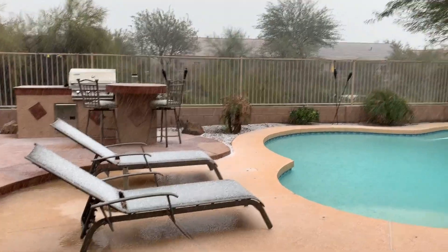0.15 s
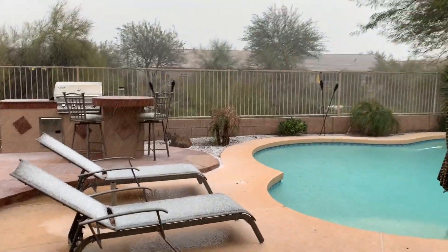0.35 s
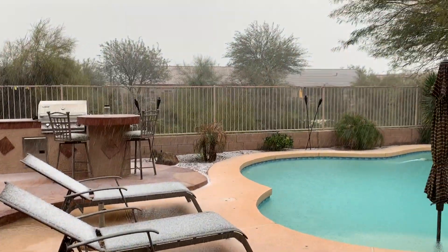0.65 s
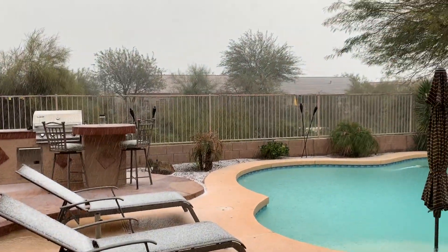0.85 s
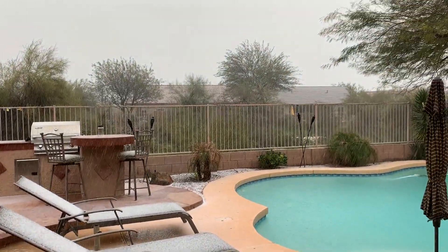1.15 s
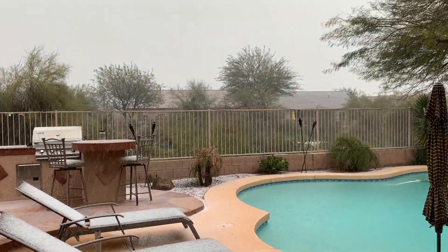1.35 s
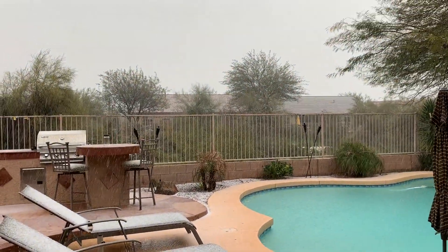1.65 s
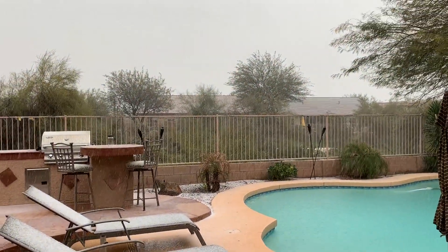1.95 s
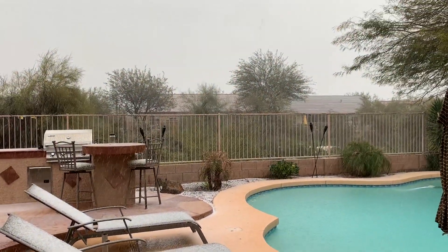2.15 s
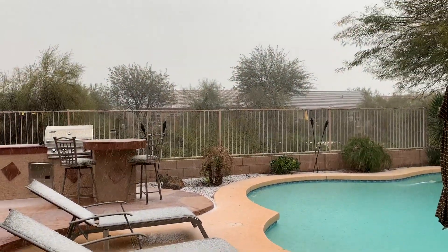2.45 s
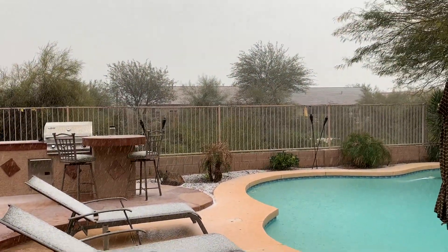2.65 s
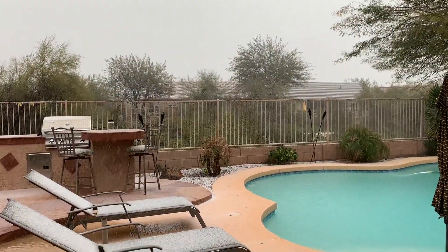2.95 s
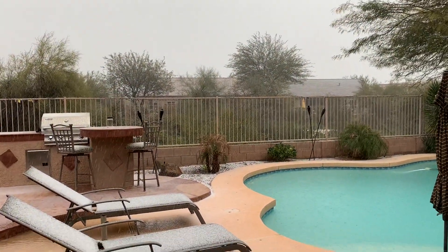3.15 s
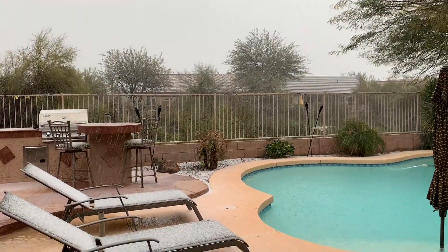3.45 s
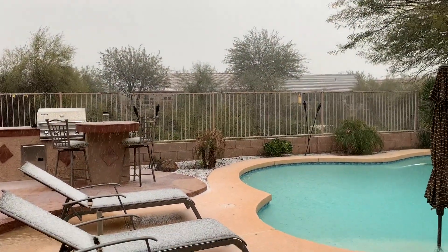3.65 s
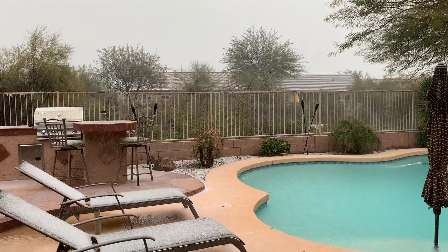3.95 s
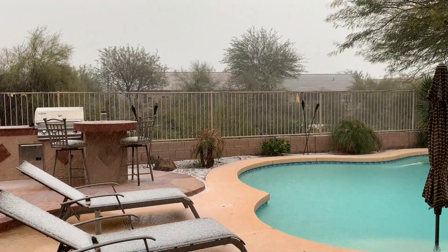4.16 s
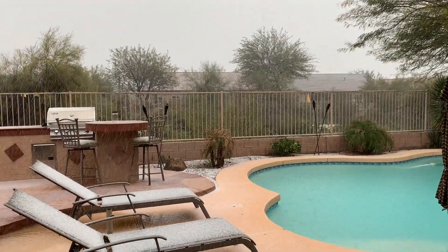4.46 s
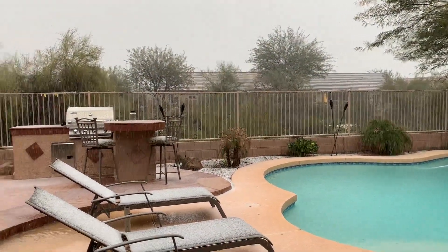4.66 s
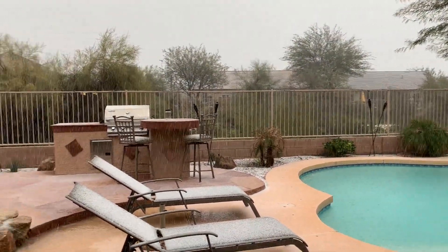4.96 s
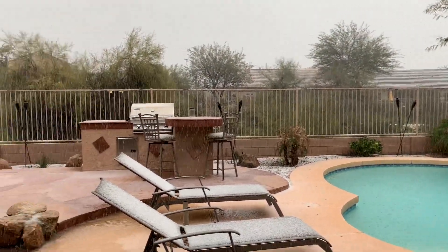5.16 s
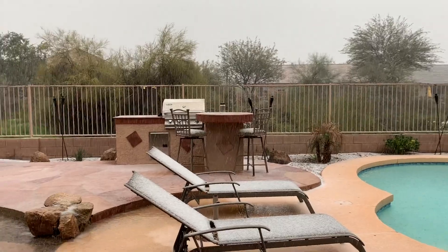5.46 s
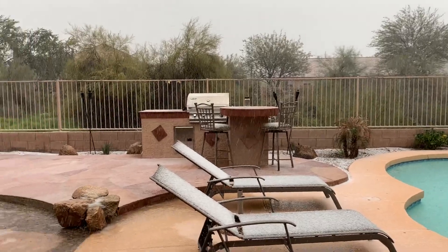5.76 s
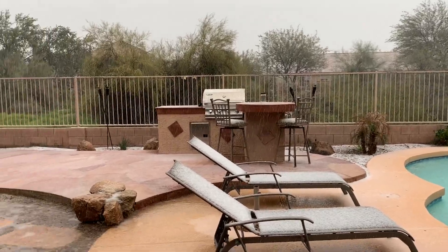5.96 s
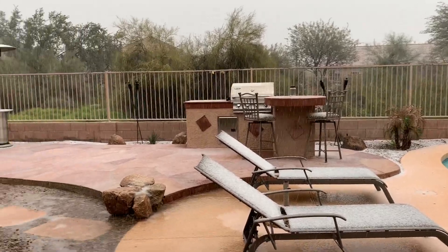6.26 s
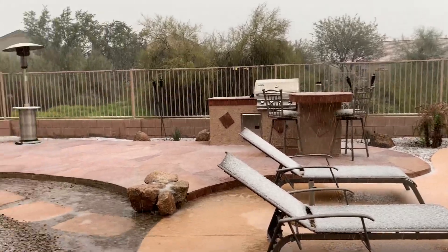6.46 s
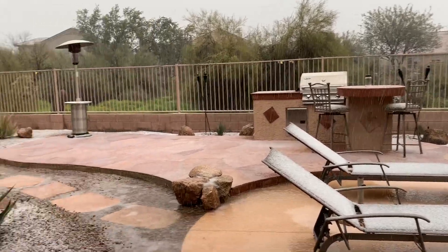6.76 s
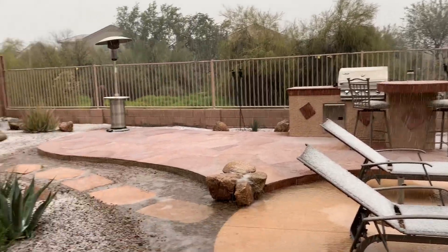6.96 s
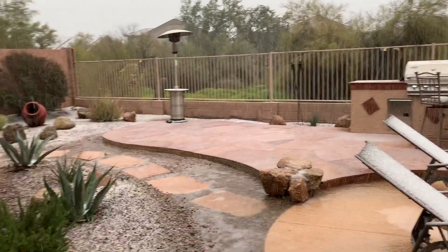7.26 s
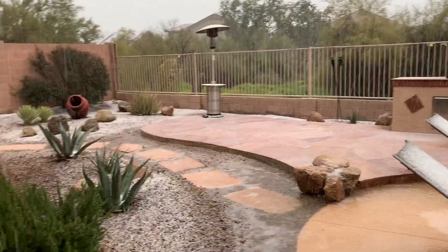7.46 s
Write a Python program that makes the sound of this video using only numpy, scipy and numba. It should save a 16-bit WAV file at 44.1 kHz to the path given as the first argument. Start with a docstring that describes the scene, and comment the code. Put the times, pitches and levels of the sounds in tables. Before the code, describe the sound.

Sleet patters densely across a backyard patio, puddle drips plopping and pellets clicking nearby, while soft gusts bump the microphone and one pellet crackles apart.

```python
"""Ice pellets and rain fall on a concrete patio, loungers and a pool, heard by a phone under the eaves.
From the start, thousands of tiny clicks and pings merge into a grainy hiss, over wind made of low noise.
Soon drips plop (a strike, then a ringing bubble), near pellets tick, and hollow furniture knocks.
The level dips briefly near 1 s. From about 2.4 s gusts thump on the microphone ports as short low tones.
Near 6.4 s a pellet shatters close by, and its chips crackle as a cluster of tiny clicks."""
import sys
import numpy as np
from scipy import signal
from scipy.fft import rfft, irfft, next_fast_len
from scipy.io import wavfile
from scipy.ndimage import uniform_filter1d
from numba import njit

SR = 44100
rng = np.random.default_rng(int(sys.argv[2]) if len(sys.argv) > 2 else 0)


def file_out(sig):
    """Save sig as 16-bit WAV at sys.argv[1]."""
    # one column per channel
    cols = np.atleast_2d(sig).T
    # limit, then scale
    lim = np.clip(cols, -1, 1)
    pcm = np.round(lim * 32767).astype(np.int16)
    wavfile.write(sys.argv[1], SR, pcm)


N = 336065
FFT_SIZE = next_fast_len(N)
TIME, HZ = np.arange(N) / SR, np.fft.rfftfreq(FFT_SIZE, 1 / SR)


def undb(db):
    """Turn decibels into a plain gain."""
    return 10 ** (np.asarray(db) / 20)


def curve(table):
    """Gain over time, drawn through rows of start_s, level_db."""
    return undb(np.interp(TIME, *np.transpose(table)))


def colour(table):
    """Gain over frequency, drawn through rows of pitch_hz, level_db on a log pitch scale."""
    hz, db = np.transpose(table)
    return undb(np.interp(np.log(HZ + 1), np.log(hz), db))


def walk(rate_hz):
    """A slow random wander: random steps, rate_hz of them a second, smoothed twice."""
    hold = int(SR / rate_hz)
    steps = np.repeat(rng.standard_normal(N // hold + 1), hold)
    return uniform_filter1d(uniform_filter1d(steps, hold), hold)[:N]


def highpass(x, hz):
    """Remove the bass, since small things move no air there."""
    return signal.sosfilt(signal.butter(2, hz, "high", fs=SR, output="sos"), x)


def impacts(per_s, scatter_db):
    """Spectrum of a shower of clicks of either sign, a few much louder than the rest; overall rms 1."""
    when, sign, size = rng.random((3, FFT_SIZE))
    loudness = undb(-scatter_db * np.log(size + 0.00043))
    clicks = (when < per_s / SR) * np.sign(sign - .5) * loudness
    return rfft(clicks / clicks.std())


@njit
def rings(length, start, turn, decay, size):
    """Add up fading tones; turn is radians per sample and decay is the fading rate per sample."""
    out = np.zeros(length)
    for k in range(len(start)):
        step, state = np.exp(1j * turn[k] - decay[k]), size[k] + 0j
        for i in range(start[k], min(start[k] + int(5 / decay[k]), length)):
            state *= step
            out[i] += state.imag
    return out


def pings(per_s, cycles, scatter_db):
    """Spectrum of many small pellets and bubbles, each ringing some cycles at its own pitch; rms 1."""
    when, pitch, size = rng.random((int(per_s * N / SR), 3)).T
    turn = 2 * np.pi * (400 + 15200 * pitch) / SR  # 400 to 15600 Hz
    decay = turn / (2 * np.pi * cycles)
    # the square root gives short and long rings the same energy
    loudness = np.sqrt(decay) * undb(-scatter_db * np.log(size + 0.0074))
    x = rings(FFT_SIZE, (when * N).astype(np.int64), turn, decay, loudness)
    return rfft(x / x.std())


def add(out, s, db, hz, pan_db, lag_ms, rise_s, t60_s, glide=0., noisy=0., grit_hz=1000., loose=0.85):
    """Add one ringing impact: a quick rise to s, then a fade; a hard contact is partly noise."""
    pad = 16  # samples of room for the ear that hears it first
    t = np.arange(int((rise_s + t60_s) * SR) + 2 * pad) / SR
    start = int((s - rise_s) * SR) - pad
    # the push peaks near s, give or take a random shift of about `loose` radians
    phase = np.pi / 2 - 2 * np.pi * hz * rise_s + loose * rng.standard_normal()
    grit = 1 + noisy * rng.standard_normal(2048)
    for ear, side in enumerate((.5, -.5)):  # left, right
        u = np.maximum(t - pad / SR - side * lag_ms / 1000, 0)
        rise = np.sin(np.pi / 2 * np.minimum(u / rise_s, 1)) ** 2
        shape = rise * undb(-60 * np.maximum(u - rise_s, 0) / t60_s)
        # the pitch moves by the share `glide` over t60_s
        ring = np.sin(phase + 2 * np.pi * hz * u * (1 + glide * u / t60_s / 2))
        wave = shape * ring * np.interp(u * grit_hz, np.arange(len(grit)), grit)
        # give it the energy of a clean tone with this shape
        wave *= undb(db + side * pan_db) * np.sqrt(np.sum(shape ** 2) / np.sum(wave ** 2) / 2)
        out[ear, start:start + len(t)] += wave[:N - start]


# Loudness of the whole fall, applied on top of its colour: start_s, level_db
FALL_LEVEL = [(0.0, -35.5), (1.12, -37), (3.5, -37.5), (6.11, -37.5), (6.49, -37), (6.9, -38),
              (7.62, -37.5)]
# Tone of the patter in the left channel: pitch_hz, level_db (relative)
PATTER_COLOUR = [(100, -8), (300, -1), (600, 2), (1000, 0.6), (2000, 1), (4000, 2.05), (7000, 0.5),
                 (9000, -1), (10600, -5), (11500, -4.5), (13000, -4.5), (15700, -5)]
# Right channel against the left, with an abrupt lift in the treble: pitch_hz, level_db (right minus left)
RIGHT_COLOUR = [(200, 0), (1000, -3.5), (1900, -0.7), (4500, -0.6), (7930, 0.3), (8030, 6.6), (9400, 2.6),
                (10500, 0), (16000, 0)]
# Stereo likeness of the hiss by pitch: opposite in the two channels near 11 kHz, identical near 13.5 kHz:
# pitch_hz, likeness (0 to 1), phase_turns (right against left)
STEREO_LIKENESS = [(100, .92, 0), (500, .5, 0), (1400, .02, 0), (1500, .02, .5), (1900, .25, .5),
                   (2400, .1, .5), (2950, .22, .5), (3400, .03, .5), (3700, .05, .1), (4300, .36, .05),
                   (4720, .06, -.25), (4950, .4, -.46), (5200, .62, -.5), (5450, .4, -.58),
                   (5750, .22, -.85), (6250, .52, -1.03), (6850, .2, -1.3), (7230, .52, -1.51),
                   (7650, .2, -1.6), (8000, .27, -2.07), (8300, .43, -2.12), (9300, .42, -1.97),
                   (10300, .55, -1.73), (10900, 1, -1.5), (11900, 1, -1.5), (12100, .6, -1.35),
                   (12650, .65, -1.15), (12850, 1, -1), (14200, 1, -1), (14500, .6, -.87),
                   (14900, .55, -.65), (15100, 1, -.5)]


def patter():
    """The dense fall: each band has its own shower and flickers a little; stereo likeness varies by pitch."""
    hz, like, turns = np.transpose(STEREO_LIKENESS)
    like = np.clip(np.interp(HZ, hz, like), 0, 1)
    from_left = like * np.exp(2j * np.pi * np.interp(HZ, hz, turns))
    right_only = np.sqrt(1 - like ** 2)
    left_colour = colour(PATTER_COLOUR)
    right_colour = left_colour * colour(RIGHT_COLOUR)
    # a short smear: every impact arrives with its reflections off slab and walls
    smear = rfft(rng.standard_normal(256) * np.exp(-np.arange(256) / 40), FFT_SIZE)
    smear /= np.abs(smear)  # spread in time only, same tone
    swell = walk(9)
    octave = np.clip(np.log2(HZ / 250 + 1e-9), 0, 6)
    pings_a = undb(-6.5) * pings(1500, 36.0, 2.22)
    pings_b = undb(-6.5) * pings(1500, 36.0, 2.22)
    out = np.zeros((2, N))
    for k in range(7):  # overlapping octave bands, centred from 250 Hz up
        band = np.sqrt(np.clip(1 - np.abs(octave - k), 0, 1)) * smear
        a = impacts(9000, 1.97) + pings_a
        b = impacts(9000, 1.65) + pings_b
        left = left_colour * a
        right = right_colour * (from_left * a + right_only * b)
        pair = irfft(band * np.array([left, right]))[:, :N]
        out += pair * undb(.45 * swell + .6 * walk(25))  # all bands swell together, each flickers alone
    return out * curve(FALL_LEVEL)


# Strength of the wind's rumble, before its random swell: start_s, level_db
GUST_LEVEL = [(0.0, -49.5), (.59, -48), (1.4, -51.5), (1.6, -50), (2.22, -49.5), (2.35, -46.5),
              (2.5, -35.5), (2.68, -42), (2.8, -45.5), (3.35, -42), (3.95, -45), (4.46, -52), (4.63, -45),
              (4.75, -50), (4.97, -42.5), (5.12, -37), (5.22, -52.5), (5.82, -45.5), (6.1, -50),
              (6.92, -45), (7.39, -44), (7.51, -36.5), (7.62, -47)]
# Tone of the low rumble: pitch_hz, level_db (relative)
RUMBLE_COLOUR = [(12, -22), (25, -6.5), (45, 0.5), (80, -3), (130, -10.5), (250, -37), (600, -89)]
# Tone of the higher flutter: pitch_hz, level_db (relative)
FLUTTER_COLOUR = [(60, -15.5), (130, 1.7), (220, -1), (350, -8.5), (600, -49), (1200, -80)]
# Puffs that catch a port edge and flutter hard: peak_s, peak_db (before the swell), half_width_s (to 1/e)
EDGE_PUFFS = [(2.47, -53, 0.035), (2.6, -53, 0.036), (2.69, -41, 0.021), (2.87, -60, 0.037),
              (5.056, -38, 0.019), (7.07, -62, 0.023), (7.45, -48.5, 0.025)]
# flutter level at the calm gust level, and the dB it gains per dB of gust
CALM_DB, FLUTTER_DB, FLUTTER_SLOPE = -58, -56, 0.14


def wind():
    """Turbulence is low noise that both ports hear nearly alike; its higher flutter grows with the gusts."""
    gust = curve(GUST_LEVEL)
    flutter = undb(FLUTTER_DB) * (gust / undb(CALM_DB)) ** FLUTTER_SLOPE
    for s, db, width_s in EDGE_PUFFS:
        flutter = flutter + undb(db) * np.exp(-((TIME - s) / width_s) ** 2)
    out = np.zeros((2, N))
    for tone, gain in ((RUMBLE_COLOUR, gust), (FLUTTER_COLOUR, flutter)):
        noise = np.array([impacts(3000, 1.0), impacts(3000, 1.6)])
        mid, side = irfft(colour(tone) * noise)[:, :N]
        # a weak second noise, of opposite sign at the two ports
        pair = (mid + undb(-13.0) * side * np.array([[1], [-1]])) / mid.std()
        out += pair * gain * undb(1.36 * walk(14))
    return out


# Drips into puddles: start_s, level_db (of the strike, before the bass cut), pitch_hz (of the bubble),
# pan_db (left minus right), ring_s (time to fade 60 dB), glide (share the pitch rises over the ring)
PUDDLE_DRIPS = [(0.04, -33, 647, 1.5, 0.036, 1), (0.392, -37.5, 1025, 7, 0.053, 1),
                (1.191, -32, 1016, 2.5, 0.044, 1), (1.219, -32.5, 580, -2, 0.12, .2),
                (1.276, -39, 800, 2, 0.13, 0), (1.398, -38, 1420, 5, 0.12, 0.5),
                (1.418, -41, 740, 2, 0.1, 0), (1.574, -38, 607, 3, 0.079, 4.5),
                (2.066, -34, 1290, 2.0, .018, 2), (2.103, -33, 1210, 5, 0.03, 2.5),
                (2.136, -38, 1020, 1.5, 0.02, 2), (2.537, -38, 1400, 2.5, 0.05, 1.5),
                (2.79, -32.5, 573, 2.0, 0.044, 0), (2.812, -42, 500, 2, 0.16, 3),
                (2.985, -39, 584, 5, .08, 0), (3.023, -33, 1090, 3.0, 0.084, -0.5),
                (3.111, -37, 580, 5, 0.12, 1), (4.711, -36.5, 1000, 6, .04, -0.5),
                (4.806, -40, 840, 2.5, .02, -1.5), (4.942, -30, 880, 3, .022, 1),
                (4.951, -34, 1050, 5, .02, 2), (5.443, -35, 985, 3.5, 0.034, 2),
                (5.479, -38, 715, 3, 0.036, 1.5), (5.578, -38, 955, 7, 0.067, 0.5),
                (5.641, -29.5, 620, 5, 0.045, 0.5), (5.659, -38, 663, 7, 0.24, 5),
                (6.494, -32.5, 1170, 6, .016, 1.5), (6.578, -27.5, 1620, 6, 0.035, -0.5),
                (6.586, -33, 1570, 6, 0.025, 2), (6.91, -38.5, 1860, -0.5, 0.063, 0.5),
                (7.221, -31.5, 1780, 0.1, 0.025, 0.5), (7.229, -41, 1870, 0.1, 0.12, 1),
                (7.369, -39, 640, 0.1, 0.066, 0.5), (7.545, -43, 1140, 1.5, 0.075, 1.5)]
BUBBLE_DB = -2.5  # the bubble's ring against the strike


def plops():
    """A drop strikes with a short knock, then its trapped bubble rings, often gliding in pitch."""
    out = np.zeros((2, N))
    for s, db, hz, pan_db, t60_s, glide in PUDDLE_DRIPS:
        # the drop strikes
        add(out, s + 0.00133, db, 0.8 * hz, pan_db, -.09, .0006, .009, noisy=0.48, grit_hz=1300)
        # its bubble rings
        add(out, s + 0.00236, db + BUBBLE_DB, hz, pan_db, -.09, .002, t60_s,
            glide=glide, noisy=0.53, grit_hz=302)
        # its echo off the walls
        add(out, s + .012, db - 18, hz, pan_db, .09, .01, .14, noisy=3, grit_hz=600)
    return highpass(out, 350)


# Near pellets on concrete: start_s, level_db (before the bass cut), pitch_hz,
# pan_db (left minus right), lag_ms (left behind right)
CONCRETE_HITS = [(0.1409, -44, 7900, -1.8, -0.095), (0.3883, -22, 3900, 0.3, 0.02),
                 (0.5366, -18, 6700, 1, -0.3), (0.658, -25, 6030, 0.2, -0.32),
                 (1.2203, -22, 6400, -0.4, 0.0), (1.5234, -28, 7900, -5.0, 0.27),
                 (1.689, -23, 4500, -2.7, 0.042), (2.8537, -24, 5940, -1.6, -0.35),
                 (3.5088, -24, 6240, -0.7, 0.0), (3.7491, -27, 13500, 0.5, 0.0),
                 (3.7494, -18, 8700, 0.5, 0.0), (3.7493, -15, 6500, 0.5, 0.0),
                 (3.7497, -17, 4350, 3, -0.024), (3.7584, -28.6, 8250, -4.2, 0.27),
                 (4.9472, -30, 4300, 1, 0.0), (4.9964, -24, 4100, 3.6, 0.0), (5.1252, -21, 8700, -1, -0.23),
                 (5.319, -27, 3940, -1.5, 0.0), (5.6704, -22, 4880, 2.3, -0.27),
                 (5.762, -28, 3550, 1.1, -0.2), (5.9833, -29, 4460, -0.5, -0.22),
                 (6.0288, -26, 13500, 0.4, 0.29), (6.0289, -27, 7000, 0.4, 0.34),
                 (6.033, -21, 7600, -2, 0.29), (6.212, -24, 8100, -2, -0.12),
                 (6.2484, -34, 8720, -0.1, 0.23), (6.3309, -24, 8000, 0.1, 0.26),
                 (6.3697, -21, 14100, -0.3, 0.23), (6.371, -27, 8700, 0, 0.23),
                 (6.3985, -31, 6000, 0, 0.13), (6.4132, -19, 13250, -1.0, 0.23),
                 (6.4134, -24, 9500, -1, 0.2), (6.418, -16.5, 4800, -1, -0.13),
                 (6.4245, -25, 8190, -2.8, -0.11), (6.4334, -17.5, 6160, 0, 0.36),
                 (6.4328, -28, 9300, 0, 0.33), (6.4595, -18.5, 7450, -1, 0.28),
                 (6.4592, -24, 10200, 1, 0.296), (6.885, -26, 5930, -1, 0.0)]


def ticks():
    """A pellet on concrete gives a hard, very short click and a faint wash off the walls."""
    out = np.zeros((2, N))
    for s, db, hz, pan_db, lag_ms in CONCRETE_HITS:
        add(out, s, db, hz, pan_db, lag_ms, .0003, .002, noisy=0.15, grit_hz=8200)
        add(out, s + .004, db - 21, hz, pan_db, -lag_ms, .003, .07, noisy=3, grit_hz=4000)
    return highpass(highpass(out, 2600), 2600)


# Pellets on one hollow piece of furniture to the left: start_s, level_db (before the bass cut)
FURNITURE_HITS = [(0.6386, -33), (1.6044, -28), (2.5508, -40), (3.049, -32), (3.9715, -28), (3.98, -33),
                  (3.996, -38), (4.751, -29.5), (4.946, -31), (5.6414, -30), (5.7586, -34), (6.0147, -32),
                  (6.417, -36)]
KNOCK_HZ, KNOCK_SCATTER = 2260, 0.04  # the pitch scatters by this share with the spot struck
KNOCK_LAG_MS = -0.11  # negative: the left port hears it first


def knocks():
    """A hollow body knocks at two pitches an octave apart, followed by a soft echo."""
    out = np.zeros((2, N))
    for s, db in FURNITURE_HITS:
        hz = KNOCK_HZ * (1 + KNOCK_SCATTER * rng.standard_normal())
        add(out, s, db, hz, 0, KNOCK_LAG_MS, .0006, .009, noisy=0.47, grit_hz=1790)
        # the duller body
        add(out, s, db - 4.0, .5 * hz, 0, KNOCK_LAG_MS, .0006, .008, noisy=0.4, grit_hz=1500)
        # its echo off the walls
        add(out, s + .015, db - 12, .8 * hz, 0, -KNOCK_LAG_MS, .01, .16, noisy=3, grit_hz=2500)
    return highpass(out, 350)


# Eddies that burst on the ports: start_s (of the peak), level_db, pitch_hz
EDDY_BURSTS = [(2.384, -29, 80.6), (2.43, -31, 80), (2.488, -20, 60.3), (2.54, -30, 149), (2.5755, -32, 60),
               (2.646, -30, 60), (2.6897, -27, 60), (2.734, -21, 77), (2.937, -33, 60), (3.1294, -29.5, 60),
               (3.2007, -32, 80), (3.298, -32.5, 50), (3.4615, -27.5, 79.5), (3.5094, -29, 60),
               (3.568, -31, 78.5), (3.668, -34.5, 80), (3.823, -30, 79), (3.868, -30.5, 60),
               (4.001, -30, 59), (4.623, -31.5, 59.5), (5.0294, -33, 60), (5.042, -33, 110),
               (5.0535, -28.5, 130), (5.079, -26, 62), (5.662, -31, 60), (7.143, -29, 50),
               (7.187, -29.5, 80.6), (7.211, -28.5, 60), (7.31, -31, 91), (7.443, -24, 79),
               (7.4774, -28, 79.4), (7.5708, -32, 80)]


def thumps():
    """A single eddy bursting on the ports gives a short, low, slightly noisy tone."""
    out = np.zeros((2, N))
    for s, db, hz in EDDY_BURSTS:
        pan_db = 2.6 * rng.standard_normal()
        add(out, s, db, hz, pan_db, .3, .011, .07, noisy=0.35, grit_hz=99, loose=2.96)
    return out


# A pellet shatters close by: start_s, end_s, level_db (of the quietest chip, before the bass cut)
SHATTER = (6.408, 6.465, -38.5)


def chips():
    """Chips of a shattered pellet crackle: 40 tiny noisy clicks at random times, pitches and sides."""
    out = np.zeros((2, N))
    first, last, db = SHATTER
    for when, size, pitch, side in rng.random((40, 4)):
        s = first + when * (last - first)
        hz = 2800 * 5 ** pitch  # 2800 to 14000 Hz
        add(out, s, db + 6 * size, hz, 6 * side - 3, .5 * side - .25, .0004, .004,
            noisy=1.1, grit_hz=5000)
    return highpass(highpass(out, 2600), 2600)


def scene():
    """Everything that reaches the two ports."""
    return patter() + wind() + plops() + ticks() + knocks() + thumps() + chips()


DIP_S, DIP_WIDTH_S, DIP_DEPTH = 1.033, 0.0069, 0.85  # centre, half width to 1/e, share of the level lost
TOP_HZ = 15780  # hardly anything passes above this


def record(dry):
    """A brief drop in level, and the phone's steep top cut."""
    dip = 1 - DIP_DEPTH * np.exp(-((TIME - DIP_S) / DIP_WIDTH_S) ** 2)
    top_cut = signal.ellip(12, .2, 70, TOP_HZ, fs=SR, output="sos")
    return signal.sosfilt(top_cut, dry * dip)


dry = scene()
out = record(dry)
file_out(out)
```